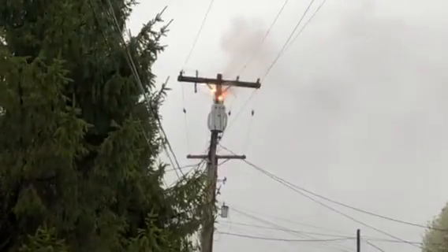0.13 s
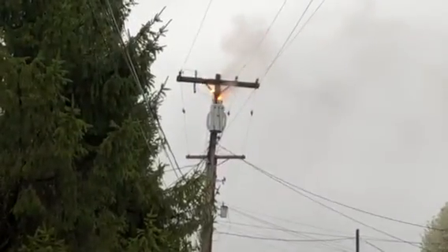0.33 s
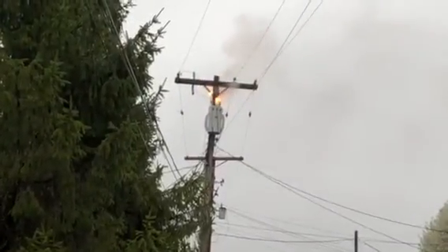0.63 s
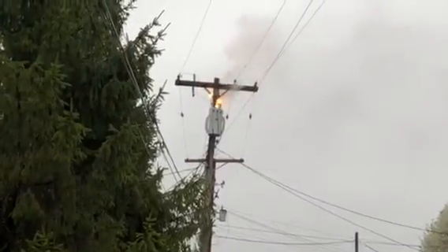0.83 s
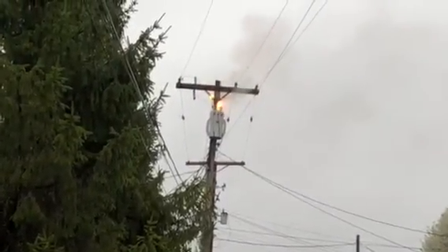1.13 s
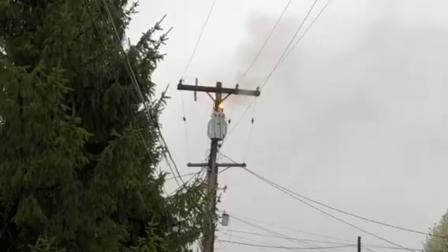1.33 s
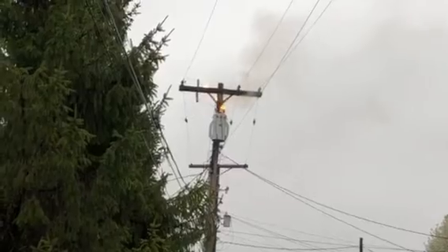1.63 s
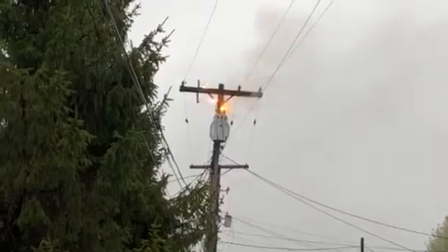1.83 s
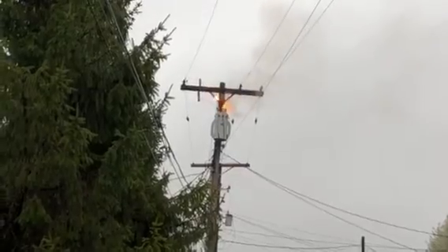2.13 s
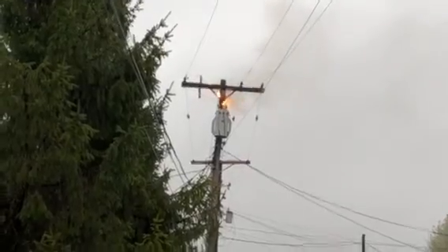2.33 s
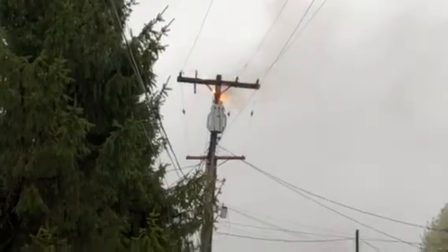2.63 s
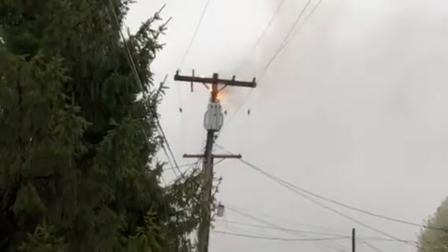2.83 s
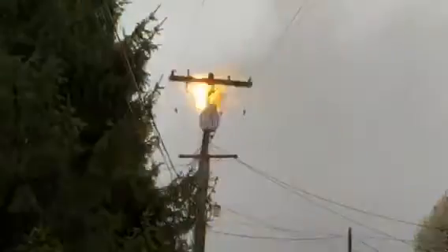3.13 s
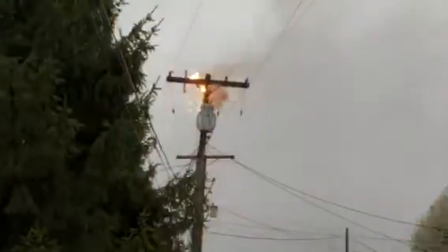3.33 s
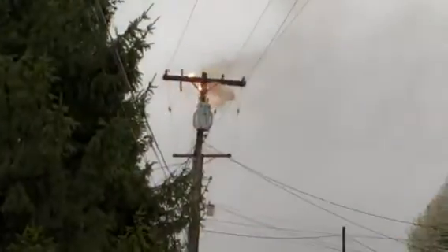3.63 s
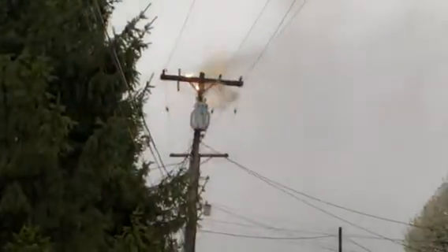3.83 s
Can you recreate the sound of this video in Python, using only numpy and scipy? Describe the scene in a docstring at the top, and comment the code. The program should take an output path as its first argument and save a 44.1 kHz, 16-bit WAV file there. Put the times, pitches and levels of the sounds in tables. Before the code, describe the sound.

An arcing transformer on a pole lets off three sharp, loud bangs that echo off trees and houses. The last breaks into a brief buzzing roar and fading hum. Faint sizzles and small birds fill the gaps.

```python
"""Outdoors by a power pole, among trees and houses, one microphone above the ground.
The transformer flashes over: sharp bangs and snaps, then a brief roaring arc at twice the mains rate.
Each bang bounces off the ground, rolls through the trees and returns from the house walls.
Between the bangs the fire sizzles and small birds whistle over a faint background."""
import sys
import numpy as np
from scipy import signal
from scipy.fft import rfft, irfft
from scipy.io import wavfile
from scipy.ndimage import uniform_filter1d

SR = 44100
rng = np.random.default_rng(int(sys.argv[2]) if len(sys.argv) > 2 else 0)


def digitize_waveform(pressure):
    """Quantize a signal to 16-bit integers and store it at the path in sys.argv[1].

    Rows of a 2-D input are taken as channels; values are limited to [-1, 1].
    """
    field = np.atleast_2d(pressure).T
    bounded = np.clip(field, -1, 1)
    quanta = np.round(bounded * 32767).astype(np.int16)
    wavfile.write(sys.argv[1], SR, quanta)


N = 176400
T = np.arange(N) / SR
HZ = np.fft.rfftfreq(2 * N, 1 / SR) + 1e-3

THUMP_HZ, THUMP_OCTAVES, RING_OCTAVES = 73, 0.51, 0.21
SWELL_POWER, CRACKLE_RELEASE_S = 0.8, 0.0021
SLAP_DB_PER_S = -1100  # the longer the crackle's lead, the less it slaps back from walls
# Flashovers up on the pole: t/s, crackle lead/s, shock/dB, crackle/dB, sent to surroundings/dB,
# bass edge/Hz, tilt/(dB per octave), thump/dB, peak or dip f/Hz, its gain/dB
FLASHOVERS = [(0.2842, 0.0048, 13, 12, 9, 110, -0.24, -5, 2800, -4),
              (1.9071, 0.00081, -7, -8.5, -3, 230, -2.3, -26, 344, 5),
              (1.9232, .001, -36, -18, -7.5, 300, -4, -40, 1000, -7),
              (1.9469, .001, 10, 5.5, 19, 161.7, -0.54, 4.5, 1530, 4),
              (2.5247, 0.0039, -8.5, -5, -2.5, 220, -0.17, -24.5, 5080, 6.5),
              (3.2108, 0.0076, 11.5, 14.5, 13, 248, -1.2, 11.5, 653, 8)]

def bangs():
    """Crackle swells to a shock and a low thump; returns the sound sent to microphone, trees and walls."""
    direct, to_trees, to_walls = np.zeros((3, N))
    thump = unit(1 / (1 + (np.log2(HZ / THUMP_HZ) / THUMP_OCTAVES) ** 4))
    for s, lead, shock_db, crackle_db, sent_db, bass_hz, tilt_db, thump_db, ring_hz, ring_db in FLASHOVERS:
        rise = np.clip(1 + (T - s) / lead, 0, 1) ** SWELL_POWER
        release = np.exp(-np.maximum(T - s, 0) / CRACKLE_RELEASE_S)
        shock = signal.unit_impulse(N, round(s * SR))
        ring = amp(ring_db / (1 + (np.log2(HZ / ring_hz) / RING_OCTAVES) ** 2))
        spectrum = unit(blast(bass_hz, tilt_db) * ring)
        discharge = amp(shock_db) * shock + amp(crackle_db) * crackle(rise * release)
        direct += colour(discharge, spectrum) + amp(thump_db) * colour(shock, thump)
        sent = amp(sent_db) * colour(shock, spectrum)
        to_trees += sent
        to_walls += amp(SLAP_DB_PER_S * lead) * sent
    return direct, to_trees, to_walls


# Tone of a discharge in open air: f/Hz, relative density/dB
BLAST_SPECTRUM = [(30, -2), (70, 10), (130, 1.5), (300, -4), (650, -8), (1400, -10.5), (2500, -16.5),
                  (4500, -17), (6500, -18.5), (9000, -26), (16000, -34.5)]

def blast(bass_hz, tilt_db):
    """Spectrum of a discharge: the larger it is, the deeper it reaches."""
    tilted = amp(read(BLAST_SPECTRUM, HZ) + tilt_db * np.log2(HZ))
    return unit(tilted / np.sqrt(1 + (bass_hz / HZ) ** 6))


ARC_START_S, ARC_END_S, ARC_HZ, ARC_UNEVEN = 3.2215, 3.285, 120.33, 0.24
PUSH_DB, RASP_DB, PUFF_S = 9.5, 11, 0.0025
# The arc at the pole, just after the last bang: t/s, relative level/dB
ARC_ENVELOPE = [(3.222, -2.5), (3.231, -4), (3.239, -3), (3.247, 3), (3.257, 2.5), (3.264, -3),
                (3.272, 2.5), (3.286, -3.5)]

def arc():
    """The arc restrikes each mains half cycle, weak and strong in turn; returns air pushes and rasp."""
    burning = (T >= ARC_START_S) * (T < ARC_END_S)
    age = (T - ARC_START_S) % (1 / ARC_HZ)
    alternation = 1 - ARC_UNEVEN * np.cos(np.pi * ARC_HZ * (T - age - ARC_START_S))
    level = amp(np.interp(T, *np.transpose(ARC_ENVELOPE))) * burning * alternation
    strikes = np.diff(age, prepend=0) < 0
    puffs = unit(np.exp(-age / PUFF_S)) * rng.standard_normal(N) * np.sqrt(ARC_HZ / SR)
    push = amp(PUSH_DB) * colour(level * strikes, blast(bass_hz=45, tilt_db=-3))
    rasp = amp(RASP_DB) * colour(level * puffs, blast(bass_hz=185, tilt_db=-1.26))
    return push, rasp


HUM_HZ, HUM_HARMONICS_DB, HUM_DRIFT_RAD, HUM_RISE_S = 120.5, [-4, -13, -21.5], 0.29, 0.025
# The arc's hum as it rolls back from a distance: t/s, relative level/dB
HUM_ENVELOPE = [(3.24, -12.5), (3.288, -11), (3.33, -28.5), (3.406, -15), (3.458, -34), (3.512, -26),
                (3.696, -53), (3.862, -38), (4.0, -57)]

def hum():
    """The arc's low hum lingers and swells again from far away."""
    onset = np.clip((T - ARC_START_S) / HUM_RISE_S, 0, 1)
    level = amp(np.interp(T, *np.transpose(HUM_ENVELOPE))) * onset
    drift = unit(uniform_filter1d(uniform_filter1d(rng.standard_normal(N), size=3000), size=3000))
    phase = 2 * np.pi * HUM_HZ * T + HUM_DRIFT_RAD * drift
    return level * np.sqrt(2) * sum(amp(db) * np.sin(k * phase) for k, db in enumerate(HUM_HARMONICS_DB, 1))


HISS_OCTAVES = 0.56
# Gas and flame on the pole: centre t/s, width/s, level/dB, centre f/Hz
GAS_JETS = [(.263, 0.0016, -61, 5500), (0.563, 0.0029, -52.5, 4500), (0.838, 0.015, -62, 6560),
            (1.25, 0.019, -67, 7500), (1.284, 0.0077, -56.5, 7000), (1.281, 0.012, -49.5, 350),
            (1.349, 0.0067, -64, 300), (1.498, 0.0093, -62, 380), (1.70, 0.0034, -64, 11500),
            (1.73, .003, -75, 9000), (2.693, .007, -55.5, 5300), (3.065, 0.014, -68, 8000),
            (3.194, 0.0037, -55.5, 5500), (3.2181, 0.0023, -16, 8000), (3.245, 0.0014, -16, 3800),
            (3.257, 0.0015, -21.5, 4500), (3.273, 0.0014, -28.5, 3200)]

def hisses():
    """Jets of hot gas, sizzles and soft puffs of flame: short swells of grainy noise."""
    out = np.zeros(N)
    for s, width, db, hz in GAS_JETS:
        grains = rng.standard_normal(N) * rng.exponential(1, N)
        band = np.exp(-.5 * (np.log2(HZ[::2] / hz) / HISS_OCTAVES) ** 2)
        swell = np.exp(-.5 * ((T - s) / width) ** 2)
        out += amp(db) * unit(irfft(rfft(grains) * band, N)) * swell
    return out


def sparks(per_s=99, level_db=-80.5, centre_hz=4500, spread_db=4.5):
    """Tiny stray sparks tick on the burning pole."""
    fires = rng.random(N) < per_s / SR
    strength = amp(spread_db * np.minimum(rng.exponential(1, N), 3))
    band = signal.butter(1, [centre_hz / 2, centre_hz * 2], "band", fs=SR, output="sos")
    return amp(level_db) * unit(signal.sosfilt(band, fires * strength + 1e-18))


TREES_DELAY_S, TREES_RISE_S, TREES_DB, GRASS_DB = 0.015, 0.005, -5, -8.5
LUMPS_DB, LUMPS_S, PATCHES_DB = 1.79, 0.0066, 1.52
# Trees around the microphone: f/Hz, near level/dB, near t60/s, far level/dB, far t60/s
TREE_DECAY = [(50, -1.5, 1, -16.5, 2.2), (123, 3.5, 0.85, -4, 1.84), (290, -2, 0.73, -21, 2.77),
              (700, -5.5, 0.87, -17.5, 2.53), (1730, -2.5, 1, -18.5, 3.16), (4420, -2, 0.75, -13, 1.71),
              (7900, -1.5, 0.64, -23, 1.47), (15000, 2.5, 0.38, -26, .7)]

def trees():
    """Impulse response: faint scatter from the ground, then lumpy scatter from near and far trees."""
    hz, t, noise = signal.stft(rng.standard_normal(N), SR, nperseg=512)
    near_db, near_t60, far_db, far_t60 = (
        read([(row[0], row[k]) for row in TREE_DECAY], hz)[:, None] for k in range(1, 5))
    fade = np.hypot(amp(near_db - 60 * t / near_t60), amp(far_db - 60 * t / far_t60))
    patches = uniform_filter1d(rng.standard_normal(noise.shape), size=12, axis=0)
    patches_db = PATCHES_DB * unit(uniform_filter1d(patches, size=3, axis=1))
    lumps_db = LUMPS_DB * np.interp(T / LUMPS_S, np.arange(N), rng.standard_normal(N))
    tail = signal.istft(noise * fade * amp(patches_db), SR, nperseg=512)[1][:N] * amp(lumps_db)
    tail *= np.clip((T - TREES_DELAY_S) / TREES_RISE_S, amp(GRASS_DB), 1)
    return amp(TREES_DB) * tail / np.linalg.norm(tail)


# House walls, nearest first: delay/s, level/dB, smear/s, bass edge/Hz, treble edge/Hz
WALLS = [(0.037, -5.5, 0.0025, 500, 4000), (0.087, -17, 0.0015, 600, 6026), (.292, -24.5, 0.0046, 190, 870),
         (0.438, -26.5, .005, 297, 1840), (.495, -21.5, .0007, 1300, 2400), (.515, -20, .0006, 650, 1900),
         (.995, -41, .018, 200, 700)]

def houses():
    """Impulse response: distinct wall echoes, each a little smeared and short of bass and treble."""
    out = np.zeros(N)
    for delay, db, width, low_hz, high_hz in WALLS:
        echo = crackle(np.exp(-.5 * ((T - delay) / width) ** 2))
        band = 1 / np.sqrt((1 + (low_hz / HZ) ** 4) * (1 + (HZ / high_hz) ** 6))
        out += amp(db) * colour(echo, band)
    return out


BIRD_HOLD, BIRD_WAVER, BIRD_EDGE_S = 0.7, 0.0019, 0.018
# Small birds, faint at the microphone: t/s, length/s, f/Hz, closing fall/Hz, level/dB
BIRD_CALLS = [(0.015, 0.1, 3983, 1198, -60.5), (0.816, .11, 3960, 1205, -58.5), (0.969, 0.06, 7270, 0, -62),
              (1.161, 0.055, 6050, 60, -65), (1.3, 0.18, 6850, 0, -71), (1.29, .12, 7150, 0, -70),
              (1.576, 0.28, 7250, -7, -74.5), (1.468, 0.031, 3270, 400, -66), (1.83, .07, 3050, 253, -71)]

def birds():
    """Thin held whistles, some falling at the end."""
    out = np.zeros(N)
    for s, length, hz, fall_hz, db in BIRD_CALLS:
        progress = np.clip((T - s) / length, 0, 1)
        waver = BIRD_WAVER * unit(uniform_filter1d(rng.standard_normal(N), size=300))
        pitch = hz * (1 + waver) - fall_hz * np.maximum(progress - BIRD_HOLD, 0) / (1 - BIRD_HOLD)
        envelope = np.clip(np.minimum(progress, 1 - progress) * length / BIRD_EDGE_S, 0, 1)
        out += amp(db) * envelope * np.sin(2 * np.pi * np.cumsum(pitch) / SR)
    return out


# Ambience all around the microphone: f/Hz, relative density/dB
AIR_SPECTRUM = [(15, -55), (25, -24), (43, -1), (108, 0.5), (157, -10.5), (560, -12.5), (695, -15.5),
                (775, -12.5), (2610, -23), (4030, -26.5), (4490, -26.5), (7110, -37.5), (16000, -45)]

def air(level_db=-58):
    """Faint steady outdoor noise, mostly low rumble."""
    spectrum = amp(read(AIR_SPECTRUM, HZ[::2]))
    return amp(level_db) * unit(irfft(rfft(rng.standard_normal(N)) * spectrum, N))


def amp(db):
    """Decibels to gain."""
    return 10 ** (np.asarray(db) / 20)


def unit(x):
    """Scales to an rms of one."""
    return x / np.sqrt(np.mean(abs(x) ** 2) + 1e-20)


def read(points, hz):
    """Reads a spectrum on a log-frequency axis."""
    f, value = np.transpose(points)
    return np.interp(np.log(hz + 1), np.log(f), value)


def colour(x, gain):
    """Causal filter with the given gain at each frequency."""
    cepstrum = irfft(np.log(np.maximum(gain, 1e-5)))
    cepstrum[1:N] *= 2
    cepstrum[N + 1:] = 0
    return irfft(rfft(x, 2 * N) * np.exp(rfft(cepstrum)))[:N]


def crackle(envelope):
    """Noise of unit energy under an envelope."""
    return unit(envelope * rng.standard_normal(N)) / np.sqrt(N)


def scene(ground_delay_s=0.00305, ground_gain=0.66):
    """At the microphone: discharges with ground bounce and echoes, fire and birds among the same trees."""
    direct, to_trees, to_walls = bangs()
    push, rasp = arc()
    fire = hisses() + sparks()
    song = birds()
    direct += push + rasp
    bounce = ground_gain * np.interp(T - ground_delay_s, T, direct)
    to_trees += amp(-4.5) * push + amp(-2) * rasp + amp(-2.5) * fire + amp(0.5) * song
    roll = signal.fftconvolve(to_trees, trees())[:N]
    slap = signal.fftconvolve(to_walls, houses())[:N]
    return (direct + bounce + fire + song + hum() + roll + slap + air())[None]


def record(dry, lag_cycles=1.047, lag_hz=16, ceiling=0.55, edge_hz=15950):
    """The microphone lets the bass arrive late, rounds the peaks and cuts the highest treble."""
    lag = np.exp(-2j * np.pi * lag_cycles * np.log(1 + HZ / lag_hz))
    late = irfft(rfft(dry, 2 * N) * lag)[:, :N]
    rounded = ceiling * np.tanh(late / ceiling)
    lowpass = signal.firwin(511, edge_hz, window=("kaiser", 9), fs=SR)
    return signal.oaconvolve(rounded, lowpass[None], "same")


dry = scene()
out = record(dry)
digitize_waveform(out)
```